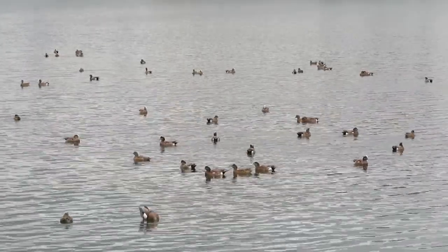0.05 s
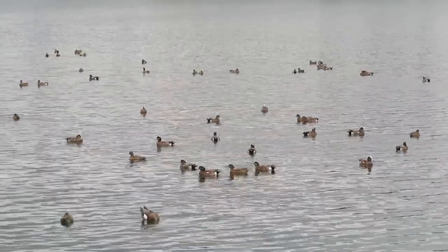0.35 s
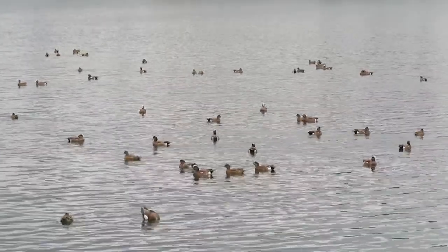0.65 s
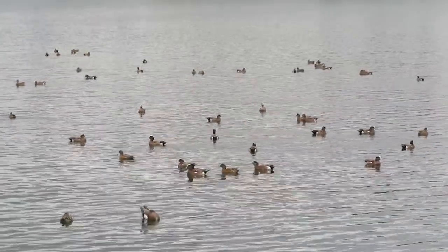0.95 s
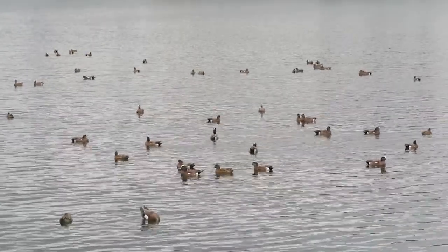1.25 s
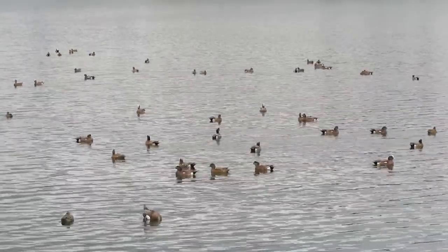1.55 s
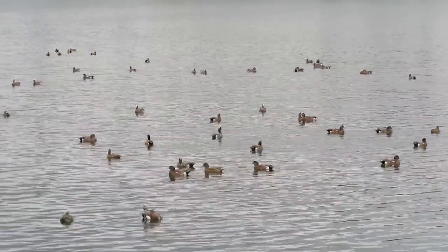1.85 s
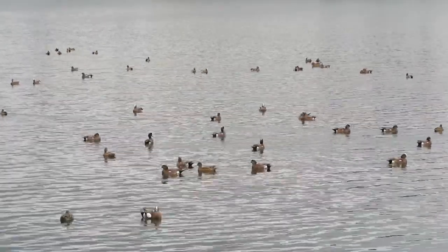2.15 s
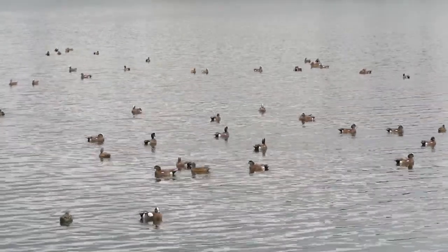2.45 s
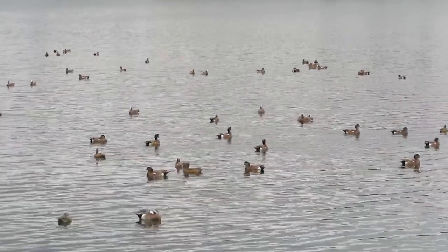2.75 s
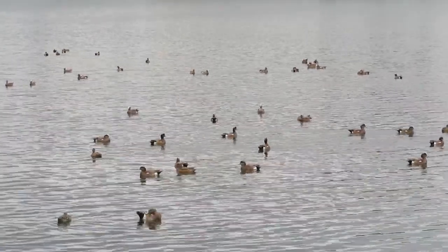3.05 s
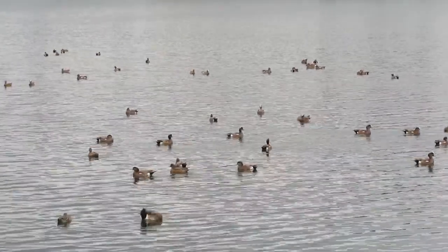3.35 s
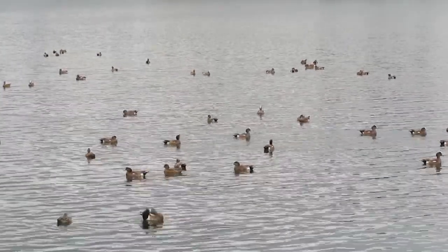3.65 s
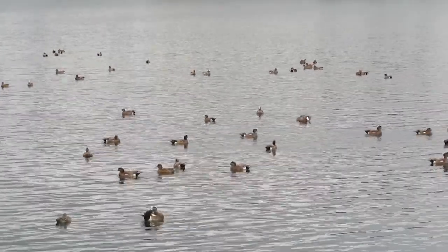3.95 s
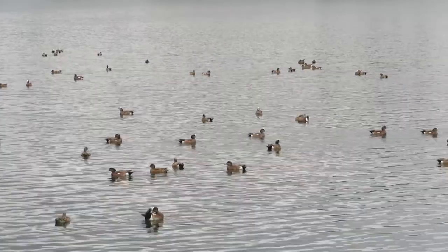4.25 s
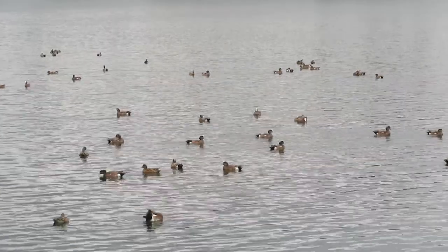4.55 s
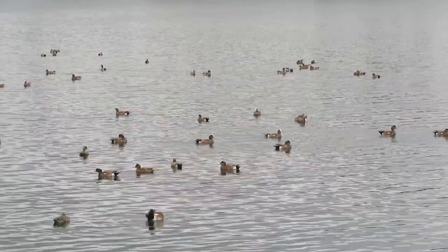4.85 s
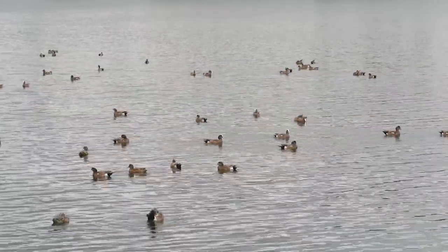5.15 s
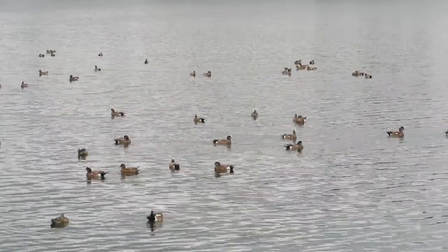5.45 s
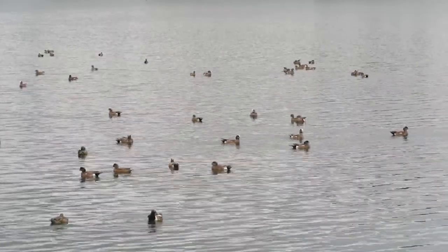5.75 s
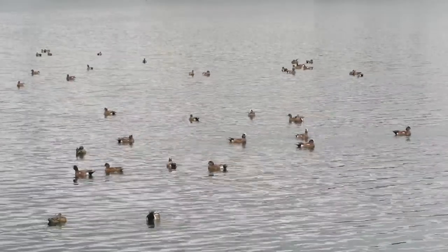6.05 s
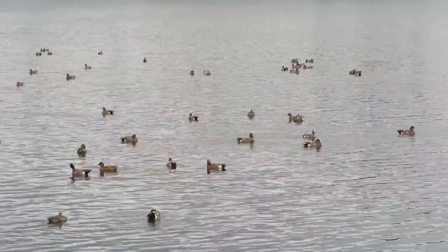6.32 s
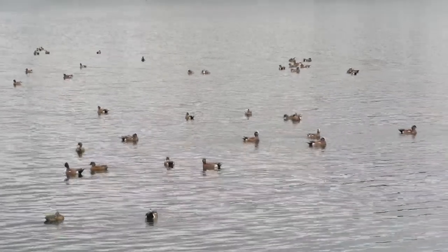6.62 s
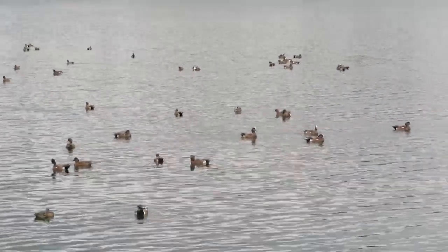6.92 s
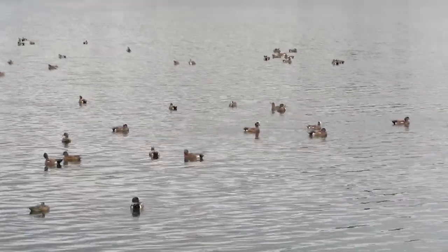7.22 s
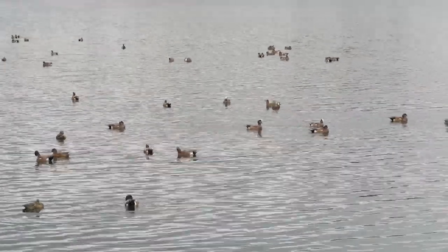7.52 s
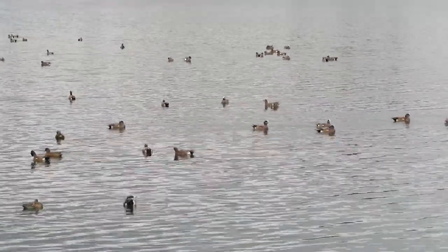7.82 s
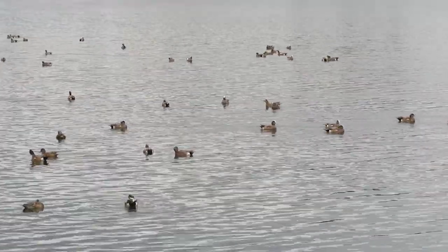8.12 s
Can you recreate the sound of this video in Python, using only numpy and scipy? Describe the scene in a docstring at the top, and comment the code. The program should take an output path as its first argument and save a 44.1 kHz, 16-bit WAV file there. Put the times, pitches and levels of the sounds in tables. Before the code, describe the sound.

A flock of ducks whistles on a lake for the whole eight seconds or so. Each call is a short, high note that rises and falls, often followed by a lower one, and the calls overlap with a slight echo. Birds further out add faint, lower whistles. One bird gives four rasps at about 0.1, 0.7, 1 and 1.9 seconds, the third the longest and loudest. The whistling is busiest from 3 to 4 seconds, with a brief low grunt at 3.2 and a whistle that cracks into a rattle at 3.5. Faint splashes and small drips come here and there, the clearest near 0.5 seconds. Underneath, distant traffic hums steadily and light wind rumbles on the microphone, with brief soft thumps at about 4.2 and 5.1 seconds.

```python
"""Wigeon on a lake.

Drakes whistle short overlapping arches, often in pairs: the syrinx sounds a gliding tone and the bill
filters its harmonics. In the first two seconds a bird gives four rasps, pulses ringing its throat;
later one whistle cracks and a duck grunts. Bills and wings splash, water and banks reflect the calls,
distant traffic hums and light wind rumbles on the microphone."""
import sys
import numpy as np
from scipy import signal
from scipy.fft import rfft, irfft, next_fast_len
from scipy.io import wavfile
from scipy.ndimage import map_coordinates

SR = 44100
rng = np.random.default_rng(int(sys.argv[2]) if len(sys.argv) > 2 else 0)


def to_wav(s):
    """Save 16-bit WAV."""
    ch = np.atleast_2d(s).T  # columns
    pcm = np.round(np.clip(ch, -1, 1) * 32767)  # PCM
    wavfile.write(sys.argv[1], SR, pcm.astype(np.int16))


N = 365148

# Each row: time in seconds, wind level in dB, traffic level in dB; only swings about the mean count.
WIND_AND_TRAFFIC = [(0.0, -44.5, -35.5), (2.952, -40, -36.5), (5.03, -35, -32), (6.37, -44.5, -34.5),
                    (7.1, -39.5, -32), (8.28, -42.5, -36.5)]


def whistle(t, top_hz, rise, db, jitter=0.0068, fall_ratio=1.4, rest_ratio=.41, full_hz=2300,
            break_hz=2250, shoulder=1.8, register_step_db=4, loud_db=-32, purity=1.7,
            hoarseness=4, turbulence=0.26, flutter_db=2):
    """Source and filter: effort, peaking at t = 0, lifts pitch and level; the bill weights harmonics."""
    # Transmission of throat and bill. Each row: frequency in Hz, gain in dB.
    bill = [(900, -56), (1450, -4), (1780, -3), (2000, 6), (2600, 7), (3200, 4), (4000, -5), (4500, -16),
            (5300, -7), (11000, -30)]
    linger, brightness = rng.standard_normal(2)
    # high calls leap into an upper register at the top and drop back onto a broad shoulder
    leap = max(np.log(top_hz / break_hz), 0)
    upper = (leap > 0) / (1 + (np.abs(t) / (.68 * rise)) ** 10)
    stretch = np.where(t < 0, 1, fall_ratio * np.exp(.13 * linger))
    from_top = np.abs(t) / (rise * (1 + shoulder * leap) * stretch)
    # low calls have rounder, shallower arches
    flatness = np.where(t < 0, 3.1, 2.6) * np.sqrt(top_hz / full_hz)
    effort = 1 / (1 + from_top ** flatness)
    lowest = rest_ratio ** (top_hz / full_hz)
    glide = np.log(lowest + (1 - lowest) * effort) - leap * (1 - upper)
    # some calls turn hoarse as the pressure drops
    rough = 1 + hoarseness * rng.random() ** 2 * (1 - effort) * (t > 0)
    hz = top_hz * np.exp(glide + jitter * rough * walk(401.5, len(t)))
    phase = 2 * np.pi * np.cumsum(hz) / SR
    # the upper register is almost a pure tone unless blown hard
    overtones_db = 2.5 * brightness + upper * purity * min(db - loud_db, 0)
    # Each row: harmonic number, base level in dB, extra level in dB.
    harmonics = [(1, 0, 0), (2, -8, overtones_db), (3, -21, overtones_db)]
    tone = sum(undb(base + extra) * response(bill, k * hz) * np.sin(k * phase)
               for k, base, extra in harmonics)
    top_rms = np.sqrt(sum((undb(base) * response(bill, k * top_hz)) ** 2 for k, base, _ in harmonics) / 2)
    # low calls are blown weakly and fade sooner on both sides of the top
    envelope = effort ** (0.28 * (full_hz / top_hz) ** 2) * np.clip(2 * (2 - from_top), 0, 1)
    envelope *= undb(db + register_step_db * (leap > 0) * (upper - 0.5))
    # turbulence in the syrinx frays the flanks of the arch
    fray = 1 + turbulence * rough * (1 - effort) * walk(1100, len(t))
    return tone / top_rms * envelope * fray * undb(flutter_db * walk(259, len(t)))


def drakes(answer_rise_s=0.028):
    """Superposition: the nearer birds' whistles overlap, single or paired with a lower answer."""
    # Each row: time of the top in seconds, pitch in Hz, nominal level in dB, rise in seconds.
    singles = [(-.02, 1954, -40, 0.032), (.33, 1440, -52.5, 0.033), (.465, 1430, -47, 0.034),
               (.59, 1290, -46, 0.034), (.877, 2540, -38, 0.034), (1.249, 2130, -37, 0.035),
               (1.509, 1950, -37, 0.021), (1.553, 1470, -42.5, 0.031), (1.575, 2070, -40.5, 0.032),
               (1.685, 1530, -47.5, 0.035), (1.878, 1460, -49, 0.04), (2.186, 1256, -45.5, 0.022),
               (2.715, 1455, -48.5, 0.021), (3.019, 1705, -51, 0.031), (3.221, 2370, -33, 0.035),
               (3.243, 2047, -38, 0.027), (3.372, 2150, -40, 0.028), (3.592, 1630, -43, 0.025),
               (3.722, 1267, -45, 0.046), (3.786, 1456, -40, 0.03), (3.944, 2094, -33.5, 0.036),
               (4.238, 1440, -46, 0.029), (4.497, 1340, -47, 0.033), (4.547, 1265, -45, 0.021),
               (4.704, 1437, -45, 0.026), (4.83, 1363, -41.5, 0.022), (4.905, 1480, -45.5, 0.026),
               (5.059, 1320, -43.5, 0.038), (5.324, 2500, -38, .03), (5.326, 1547, -40.5, .029),
               (5.677, 2480, -37.5, 0.031), (6.14, 1270, -44, 0.03), (6.303, 2430, -34, 0.026),
               (6.564, 1450, -47, 0.044), (6.609, 1760, -47, .029), (6.941, 1210, -41, 0.021),
               (7.028, 2400, -35.5, 0.034), (7.155, 1160, -46, 0.022), (7.631, 2124, -32.5, 0.032),
               (7.855, 1584, -44.5, 0.033), (7.919, 1400, -43.5, 0.029), (8.094, 2557, -37.5, 0.029)]
    # Each row: the same four, then the answer's delay in seconds, pitch in Hz and nominal level in dB.
    pairs = [(.784, 2380, -34, 0.031, .24, 2033, -35.5), (1.466, 2510, -34.5, 0.033, 0.27, 2120, -43),
             (2.326, 2380, -33.5, 0.026, 0.25, 2020, -35.5), (2.377, 2606, -32.5, 0.032, .257, 1973, -38.5),
             (2.864, 2350, -36, 0.023, 0.23, 1950, -50), (3.107, 2490, -34.5, 0.033, .239, 1980, -40),
             (3.206, 2560, -35, 0.035, .26, 1985, -39), (3.919, 2613, -33.5, 0.031, 0.25, 1980, -37.5),
             (3.979, 2320, -34, 0.041, 0.26, 1960, -37), (5.111, 2367, -33, 0.027, .229, 2020, -34.5),
             (5.178, 2570, -35, 0.036, 0.27, 1965, -36.5), (5.44, 2590, -35, 0.036, .211, 1885, -42),
             (5.785, 2540, -37, 0.03, 0.25, 1900, -42.5), (6.24, 2510, -32.5, 0.035, 0.25, 2190, -36),
             (6.759, 2370, -35, 0.03, 0.26, 1970, -45), (7.318, 2180, -31.5, 0.026, .235, 1810, -42),
             (8.052, 2094, -37.5, 0.026, 0.21, 2080, -40.5)]
    notes = list(singles)
    for at, top_hz, db, rise, gap, answer_hz, answer_db in pairs:
        notes += [(at, top_hz, db, rise), (at + gap, answer_hz, answer_db, answer_rise_s)]
    out, t = np.zeros(N), np.arange(-SR // 5, SR // 5) / SR
    for at, top_hz, db, rise in notes:
        add(out, at + t[0], whistle(t, top_hz, rise, db))
    return out


def cracked_whistle(at=3.495, top_hz=2000, db=-35, rise=0.028):
    """Random modulation: a drake's pitch wavers, and past the top his whistle breaks into a rattle."""
    out, t = np.zeros(N), np.arange(-SR // 5, SR // 5) / SR
    rattle = 1 + np.clip(t / rise, 0, 1) * walk(700, len(t))
    add(out, at + t[0], rattle * whistle(t, top_hz, rise, db, jitter=.034))
    return out


def rasps(pulse_hz=330, jitter=.09, scatter_db=3, breath_db=-2, edge_hz=4100, hiss_db=-37,
          core_hz=2340, core_db=-9.5, waver=0.029):
    """Formant resonance: uneven pulses and rushing air ring the throat around a wavering whistle."""
    # Each row: start, attack, hold and decay in seconds, level in dB.
    cries = [(0.084, 0.028, 0.087, 0.091, -34.5), (0.646, 0.11, 0.063, 0.023, -32.5),
             (1.046, 0.056, 0.25, 0.12, -28.5), (1.883, 0.021, 0.063, 0.049, -38.5)]
    # Throat resonances. Each row: frequency in Hz, bandwidth in Hz, gain in dB.
    formants = [(1160, 180, -6), (1570, 450, -3), (2050, 340, -1), (2526, 500, 1), (3630, 1800, -19)]
    # The throat slackens. Each row: time in seconds, factor on all frequencies of the cry.
    slackening = [(1.2, 1), (1.5, .9)]

    def throat(f):
        peaks = sum(undb(db) / (1 + (2 * (f - hz) / width) ** 2) for hz, width, db in formants)
        hiss = undb(hiss_db) * np.exp(-((f - 6500) / 2500) ** 2)
        return peaks / (1 + (f / edge_hz) ** 8) + hiss

    out, t = np.zeros(N), np.arange(SR * 3 // 4) / SR
    for start, attack, hold, decay, db in cries:
        envelope = np.minimum(t / attack, 1) * np.exp(-np.maximum(t - attack - hold, 0) / decay)
        cycles = np.cumsum(pulse_hz * np.exp(jitter * walk(300, SR))) / SR
        pulses = np.diff(np.floor(cycles), prepend=0) * undb(scatter_db * walk(600, SR))
        source = unit(pulses - pulses.mean()) + undb(breath_db) * rng.standard_normal(SR)
        core_phase = 2 * np.pi * np.cumsum(core_hz * np.exp(waver * walk(110, SR))) / SR
        core = np.sin(core_phase) * (1 + np.cos(2 * np.pi * cycles) / 2)
        cry = unit(unit(shaped(source, throat)) + undb(core_db) * unit(core))
        tuning = np.interp(start + t, *np.transpose(slackening))
        voice = map_coordinates(cry, [np.cumsum(tuning)], order=3)
        add(out, start, undb(db) * envelope * voice)
    return out


def grunt(at=3.215, hz=262, half_s=0.017, db=-29):
    """Missing fundamental: a duck's short, low grunt is heard by its second and third harmonics."""
    t = np.arange(N) / SR
    phase = 2 * np.pi * np.cumsum(hz * np.exp(0.016 * walk(100, N))) / SR
    envelope = undb(db) * np.exp(-((t - at) / half_s) ** 2)
    return envelope * (np.sin(2 * phase) + np.sin(3 * phase) / 2)


def far_drakes(count=46, db=-54, low_hz=1100, range_hz=500, rise=0.056):
    """Attenuation with distance: birds further out give faint, low whistles at loose intervals."""
    out, t = np.zeros(N), np.arange(-SR // 5, SR // 5) / SR
    for slot, (offset, pitch) in enumerate(rng.random((count, 2))):
        at = (slot + offset) / count * N / SR
        add(out, at + t[0], whistle(t, low_hz + range_hz * pitch ** 2, rise, db))
    return out


def splashes(grain_db=4, droplets_per_s=450):
    """Droplet impacts merge into grainy noise: dabbling and wing flicks throw up brief sprays."""
    # Each row: start in seconds, level in dB, time to swell in seconds.
    sprays = [(.048, -53, 0.0086), (.465, -51.5, 0.041), (1.541, -52, .009), (1.568, -52, 0.018),
              (2.608, -54.5, 0.023), (4.715, -58, 0.048), (6.903, -53, .01)]
    # Each row: frequency in Hz, relative level in dB.
    spectrum = [(800, -22), (2000, -7), (4000, 10.5), (6000, 2), (9000, -2.5), (12000, -9), (16000, -44)]
    droplets = rng.standard_normal(N) * undb(grain_db * walk(droplets_per_s, N))
    envelope, age = np.zeros(N), np.arange(SR // 2) / SR
    for start, db, swell in sprays:
        add(envelope, start, undb(db) * age / swell * np.exp(1 - age / swell))
    return coloured(droplets, spectrum) * envelope


def drips(decay_cycles=6.3, width_octaves=0.57):
    """Damped ringing: single drops tick on the water, the bigger ones lower and longer."""
    # Each row: start in seconds, level in dB, centre frequency in Hz.
    drops = [(0.505, -30.5, 1790), (.897, -35, 4070), (1.912, -40, 5460), (3.175, -41, 5000),
             (3.691, -40, 6500), (3.726, -35, 4330)]
    out, age = np.zeros(N), np.arange(SR // 10) / SR
    for start, db, hz in drops:
        noise = rng.standard_normal(len(age))
        tick = shaped(noise, lambda f: np.exp(-(np.log2((f + 1) / hz) / width_octaves) ** 2))
        add(out, start, undb(db) * unit(tick) * np.exp(-age * hz / decay_cycles))
    return out


def echoes(x, t60, build_s):
    """Diffuse reflection: echoes build up, then fall 60 dB in t60 seconds, different on each side."""
    t = np.arange(SR) / SR
    tail = rng.standard_normal((2, SR)) * np.exp(-np.log(1000) * t / t60) * (1 - np.exp(-t / build_s))
    tail /= np.sqrt(np.sum(tail ** 2, axis=1, keepdims=True))
    return signal.fftconvolve(x[None], tail, axes=1)[:, :N]


def town_hum(hum_db=-27.5, bass_hz=100, road_hz=720, road_width_hz=420, road_left_db=1.5, flicker_db=0.8):
    """Band modulation of distant town noise: the bass follows the wind, the tyre band the traffic."""
    # Each row: frequency in Hz, relative spectral density in dB.
    spectrum = [(20, -8), (55, -0.5), (120, 1), (155, -1.5), (250, 1.5), (390, -10), (560, -10), (820, -7),
                (1250, -17.5), (2000, -26.5), (3000, -35.5), (4500, -42.5), (10000, -53), (15000, -64)]
    # Stereo width. Each row: frequency in Hz, level of side against mid in dB.
    width = [(300, -33), (1000, -16), (2500, -6.5), (5000, -1.5), (12000, 0.5)]
    times, *levels = np.transpose(WIND_AND_TRAFFIC)
    t = np.arange(N) / SR
    wind, traffic = (undb(np.interp(t, times, db - db.mean()) + flicker_db * walk(7, N)) for db in levels)
    mid, side = (coloured(rng.standard_normal(N), spectrum) for _ in range(2))
    side = shaped(side, lambda f: response(width, f))
    channels = []
    for hum, pan in zip((mid + side, mid - side), undb([road_left_db / 2, -road_left_db / 2])):
        bass = shaped(hum, lambda f: 1 / (1 + (f / bass_hz) ** 4))
        tyres = shaped(hum, lambda f: np.exp(-((f - road_hz) / road_width_hz) ** 2))
        channels.append(hum + (wind - 1) * bass + (pan * traffic - 1) * tyres)
    return undb(hum_db) * np.array(channels)


def buffets():
    """Turbulent pressure: brief puffs of wind thump on the microphone."""
    # Each row: time of the peak in seconds, level in dB, half length in seconds.
    puffs = [(0.564, -30.5, 0.11), (4.186, -16, 0.014), (4.864, -29, 0.044), (5.142, -18, 0.024),
             (7.27, -35, 0.094)]
    # Each row: frequency in Hz, relative level in dB.
    spectrum = [(15, -10), (45, 3), (85, 20), (140, 10.5), (700, -100)]
    t = np.arange(N) / SR
    envelope = sum(undb(db) * np.exp(-((t - at) / half) ** 2) for at, db, half in puffs)
    return envelope * coloured(rng.standard_normal(N), spectrum)


def port_wind(db=-48, corner_hz=110, flicker_db=1.5):
    """Dynamic pressure: eddies stir each microphone port on its own, as the square of the wind."""
    times, wind_db, _ = np.transpose(WIND_AND_TRAFFIC)
    swing_db = np.interp(np.arange(N) / SR, times, wind_db - wind_db.mean())
    gust = undb(db + 2 * swing_db + flicker_db * walk(5.7, N))
    eddies = [unit(shaped(noise, lambda f: f / (1 + (f / corner_hz) ** 4)))
              for noise in rng.standard_normal((2, N))]
    return gust * np.array(eddies)


def undb(db):
    """Amplitude ratio of a level in dB."""
    return 10 ** (np.asarray(db) / 20)


def unit(x):
    """Scale to rms 1."""
    return x / np.sqrt(np.mean(x ** 2))


def response(points, hz):
    """Gain of a (Hz, dB) outline, interpolated in log frequency."""
    f, db = np.transpose(points)
    return undb(np.interp(np.log(np.maximum(hz, 1)), np.log(f), db))


def shaped(x, gain_at):
    """Zero-phase filtering by a gain that is a function of frequency."""
    size = next_fast_len(len(x) + 2048)
    return irfft(rfft(x, size) * gain_at(np.fft.rfftfreq(size, 1 / SR)), size)[:len(x)]


def coloured(x, points):
    """Filter by a (Hz, dB) outline, to rms 1."""
    return unit(shaped(x, lambda f: response(points, f)))


def walk(rate, size):
    """Smooth random curve through `rate` knots a second, with a spread near 1."""
    knots = rng.standard_normal(2048)
    return map_coordinates(knots, [np.arange(size) * rate / SR], order=2, mode="mirror")


def add(track, start, sound):
    """Mix a sound into a track from `start` seconds on."""
    onset = int(round(start * SR))
    first, end = max(onset, 0), min(onset + len(sound), N)
    track[first:end] += sound[first - onset:end - onset]


def scene(whistle_db=-0.24, bank_db=-18, ripple_db=-11, water_side_db=-1):
    """Direct and reflected sound add: calls and splashes on the lake, with town and wind behind."""
    calls = undb(whistle_db) * drakes() + cracked_whistle() + rasps() + grunt()
    # rippled water scatters the calls from straight ahead and blurs the far ones
    birds = calls + echoes(undb(ripple_db) * calls + far_drakes(), t60=0.12, build_s=0.0066)[0]
    # the banks answer later, from all sides
    banks = undb(bank_db) * echoes(birds, t60=0.25, build_s=0.014)
    water_mid, water_side = (splashes() + drips() for _ in range(2))
    water = water_mid + undb(water_side_db) * np.array([[1], [-1]]) * water_side
    air = town_hum() + buffets() + port_wind()
    return birds + banks + water + air


def record(dry, cutoff_hz=15600):
    """Band limiting: a steep elliptic low-pass removes the highest treble."""
    return signal.sosfilt(signal.ellip(8, .2, 70, cutoff_hz, fs=SR, output="sos"), dry)


dry = scene()
out = record(dry)
to_wav(out)
```